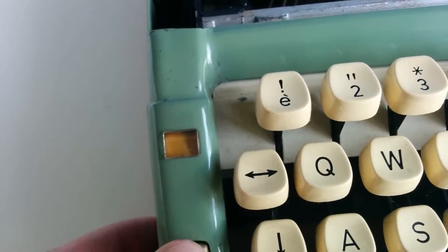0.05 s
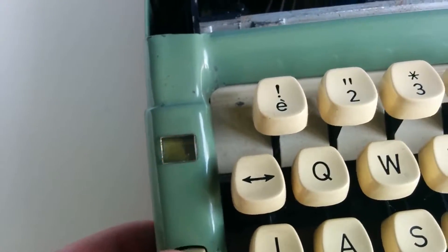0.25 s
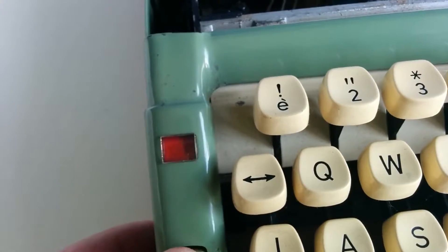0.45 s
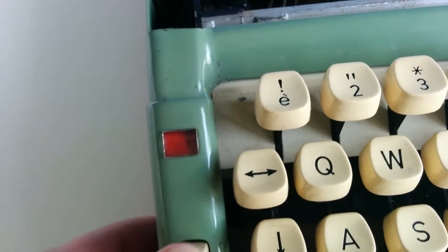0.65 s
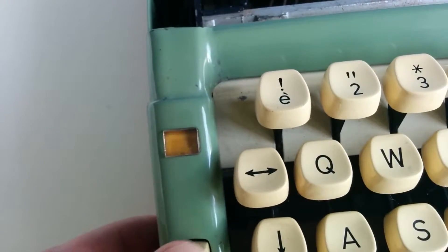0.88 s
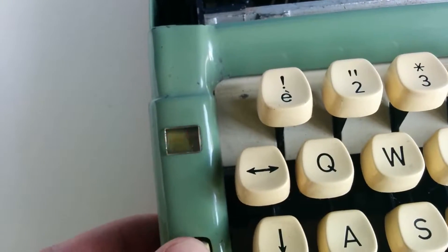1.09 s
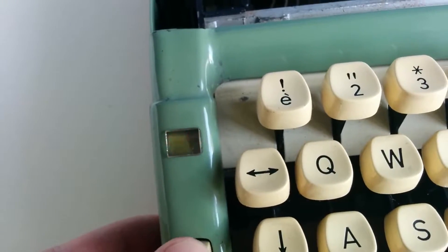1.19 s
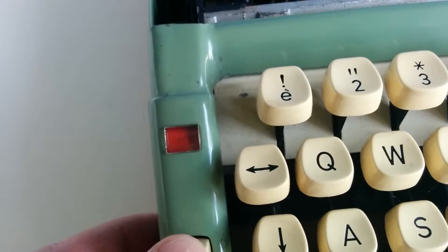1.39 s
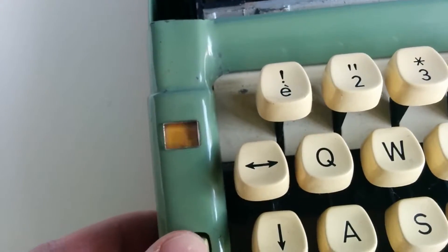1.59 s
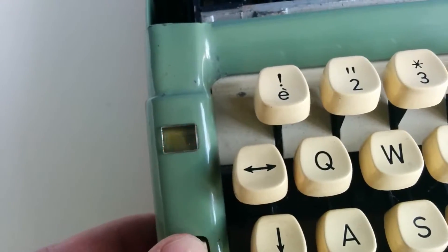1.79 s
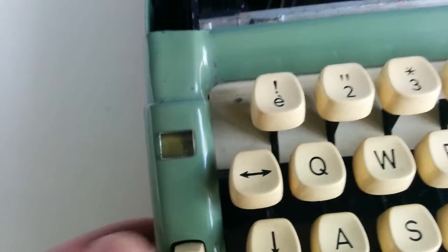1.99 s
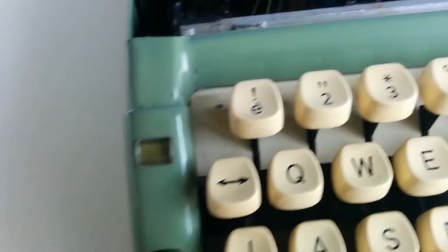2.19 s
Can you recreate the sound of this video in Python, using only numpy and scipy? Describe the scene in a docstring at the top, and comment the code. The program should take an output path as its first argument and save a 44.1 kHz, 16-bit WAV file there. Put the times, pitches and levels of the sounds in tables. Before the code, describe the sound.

Close, bright metal clacks and woody clunks as a small typewriter lever switches to and fro.

```python
"""A portable typewriter in a small, quiet room, one microphone close by. A finger flicks the ribbon-colour
lever to and fro seven times. Each round opens with a light double tick as the pawl crosses the middle
notch; a bright steel clack follows, rattling at one stop and thumping the case on the table; then the
lever comes back to the other stop with a woody clunk. Between the blows the microphone catches faint
rubbing, loose parts, a spring and the hand on the case. Springs and room ring on briefly."""
import sys
import numpy as np
from scipy import signal
from scipy.fft import rfft, irfft
from scipy.io import wavfile
from scipy.ndimage import uniform_filter1d

SR = 44100
rng = np.random.default_rng(int(sys.argv[2]) if len(sys.argv) > 2 else 0)


def log_audio(samples):
    """Write samples as a 16-bit WAV file to the path given in sys.argv[1]."""
    # one column per channel
    frames = np.atleast_2d(samples).T
    # limit to full scale, then quantise
    limited = np.clip(frames, -1, 1)
    pcm = np.round(limited * 32767).astype(np.int16)
    wavfile.write(sys.argv[1], SR, pcm)


N = 99225  # 2.25 s


def undb(db):
    """Decibels to gain; table levels are relative, and each source adds its own offset."""
    return 10 ** (np.asarray(db) / 20)


def on_log_axis(points, hz):
    """Read (Hz, value) points joined by straight lines over log frequency."""
    freqs, values = np.array(points, float).T
    return np.interp(np.log(hz + 1), np.log(freqs), values)


def noise(colour):
    """Coloured noise of rms 1, rolled off below 30 Hz."""
    hz = np.arange(N // 2 + 1) * SR / N
    spectrum = rfft(rng.standard_normal(N)) * undb(on_log_axis(colour, hz))
    wave = irfft(spectrum * hz / np.hypot(hz, 30), N)
    return wave / wave.std()


def fade(t, t60):
    """Exponential decay, 60 dB down after t60 seconds."""
    return np.exp(-np.log(1000) * np.maximum(t, 0) / t60)


def arch(start, length):
    """Half-sine swell over one movement, timed in seconds."""
    progress = np.clip((np.arange(N) / SR - start) / length, 0, 1)
    return np.sin(np.pi * progress).clip(0)


def crack(times, dbs, colour, rise, t60, tail_db, tail_t60):
    """Dense modes of each blow, as noise: a fast rise, a steep fall and a softer tail (times in s)."""
    t, power = np.arange(N) / SR, np.zeros(N)
    for at, db in zip(times, dbs):
        span = slice(max(int(at * SR), 0), int(at * SR) + SR // 4)
        age = np.maximum(t[span] - at, 0)
        decay = fade(age - rise, t60) + undb(tail_db) * fade(age - rise, tail_t60)
        power[span] += (undb(db) * np.minimum(age / rise, 1) * decay) ** 2
    return np.sqrt(power) * noise(colour)


def ring(times, dbs, modes, rise, scatter_db, detune, loose=True):
    """Each blow rings the same modes; a firm blow starts them in step, a loose one out of step."""
    hz, mode_db, t60 = np.array(modes, float).T[:, :, None]
    t = np.arange(int(min(t60.max(), 1) * SR)) / SR
    envelope = fade(t, t60) * np.minimum(t / rise, 1)
    draws = rng.standard_normal((len(times), 3, len(modes), 1))
    out = np.zeros(N + SR)
    for at, db, (size, shift, phase) in zip(times, dbs, draws):
        waves = np.cos(2 * np.pi * hz * (1 + detune * shift) * (t - rise) + loose * phase)
        gains = undb(db + mode_db + scatter_db * size)
        out[int(at * SR):][:len(t)] += (gains * envelope * waves).sum(0)
    return out[:N]


# The lever comes back to its stop (time [s], body level [dB], steel level [dB])
CLUNK_HITS = [(0.3221, 2, -1.5), (.6801, 1, -15), (0.9477, 2, 0.5), (1.2216, 1, -7), (1.459, 2, -1.5),
              (1.7250, 2, -6.5), (1.9711, 0, -0.5)]
# Contact noise of the steel snap and of the cover (frequency [Hz], level [dB])
SNAP_SPECTRUM = [(1500, -23), (3800, -0.5), (4700, -18), (5250, 11.5), (5650, -6), (6100, 6), (6900, -8),
                 (7400, 6), (8100, 0.5), (10000, -0.5), (12200, -9.5), (15500, -20.5)]
COVER_SPECTRUM = [(100, -22), (500, -17), (730, -9.5), (830, 4.5), (1150, -7.5), (1480, -5), (1850, -15.5),
                  (2100, -27.5), (2500, -1.5), (2950, -19.5), (3400, 7), (3750, -35), (4050, -18),
                  (4600, -27.5), (9000, -33)]
# Modes of the hollow cover (frequency [Hz], level [dB], t60 [s])
COVER_MODES = [(830, -6, .035), (915, -3, .035), (1030, -4, .03), (1137, -2, .055), (1215, -3, .06),
               (1335, -1, .06), (1420, -4, .055), (1515, -4, .045), (2020, -5, .045), (2180, -9, .045),
               (2455, -9, .045), (3280, -11, .03), (3415, -8, .035), (4020, -12, .03)]
def clunks(body_lag_s=0.0015, rebound_s=0.016):
    """The lever drags for a moment, snaps against its stop, and the cover answers with a hollow knock."""
    at, body_db, steel_db = np.array(CLUNK_HITS).T
    body_at = at + body_lag_s
    drag = crack(at - .0065, body_db - 22, CLICK_SPECTRUM,
                 rise=.0067, t60=.035, tail_db=-28.5, tail_t60=.04)
    snap = crack(at, steel_db - 10.5, SNAP_SPECTRUM, rise=.00026, t60=.022, tail_db=-25, tail_t60=.027)
    buzz = crack(body_at, body_db - 20, COVER_SPECTRUM, rise=.0012, t60=.025, tail_db=-14, tail_t60=.08)
    # the lever settles against the stop with a second, softer blow
    blow_at = np.r_[at, at + rebound_s] + body_lag_s
    blow_db = np.r_[body_db, body_db - 22.5]
    cover = ring(blow_at, blow_db - 17.5, COVER_MODES,
                 rise=.001183, scatter_db=0, detune=.0033, loose=False)
    case = ring(body_at, body_db - 46, CASE_MODES, rise=.003, scatter_db=-1.5, detune=.053)
    return drag + snap + buzz + cover + case


# The pawl leaves and drops into the middle notch (time [s], body level [dB], steel level [dB])
TICK_HITS = [(0.0807, -9, -13), (0.0913, -0.5, 2.5), (0.4376, -9.5, -10), (0.449, -3, -19),
             (.7420, -9.5, -9), (0.7521, -1, -2), (1.0054, -10, -10.5), (1.0172, -1.5, 5),
             (1.2707, -12, -10), (1.28, 0.5, 1), (1.522, -10, -11.5), (1.5322, -1, 0), (1.7685, -6, -5.5),
             (1.777, 1.5, 5)]
# Contact noise of small parts (frequency [Hz], level [dB])
CLICK_SPECTRUM = [(100, -12.5), (700, -15.5), (1100, -10), (1350, -1.5), (1850, -6), (2200, -2),
                  (2950, -11), (3500, -7), (4400, -6), (5100, -30.5), (6200, -12), (7000, -17.5),
                  (7700, -12.5), (9200, -23.5), (12500, -15.5), (15500, -27.5)]
# Modes of the pawl (frequency [Hz], level [dB], t60 [s])
PAWL_MODES = [(1120, -15.5, .04), (1318, -4, 0.088), (1396, -3.5, 0.06), (1527, 0, 0.067),
              (2132, -4.5, 0.069), (2600, -9, 0.096), (3476, -4, .035), (4010, -10, .035)]
def ticks(ring_lag_s=0.0011):
    """The pawl snaps over the middle notch and rings briefly."""
    at, body_db, steel_db = np.array(TICK_HITS).T
    snap = crack(at, steel_db - 25, SNAP_SPECTRUM, rise=.00055, t60=.012, tail_db=-25.5, tail_t60=.044)
    click = crack(at, body_db - 23, CLICK_SPECTRUM, rise=.0022, t60=.041, tail_db=-22, tail_t60=.15)
    pawl = ring(at + ring_lag_s, body_db - 23.5, PAWL_MODES,
                rise=.001438, scatter_db=-1, detune=.011, loose=False)
    return snap + click + pawl


# The linkage strikes the opposite stop and rebounds (time [s], steel level [dB], frame level [dB])
CLACK_HITS = [(.1485, 1.5, -0.5), (.1605, -4, -2.5), (.1755, -9.5, -8), (.1908, -17, -13.5),
              (0.5021, -8.5, -7), (.5048, 0.5, -3.5), (.5145, -6.5, -5.5), (.5202, -13, -14),
              (.8095, -3.5, -11), (.8122, -3, -2), (.8222, -3, -4), (.8275, -31, -5.5), (.8398, -8, -6.5),
              (1.0605, 0.5, -16.5), (1.0650, -6.5, -2), (1.0763, -4.5, -3.5), (1.0926, -7, -9.5),
              (1.1072, -16, -13), (1.3218, -4.5, -13.5), (1.3265, -2.5, -0.5), (1.3362, -8.5, -8.5),
              (1.3422, -6, -9.5), (1.5810, -3, -15.5), (1.5856, -4, -1), (1.5960, -6, -3),
              (1.6125, -4, -7.5), (1.6246, -34.5, -14.5), (1.8118, -2, -11), (1.8148, -1.5, -2.5),
              (1.8260, -4, -2.5), (1.8422, -5, -5), (1.8574, -15, -20.5)]
# Contact noise of the steel and of the frame (frequency [Hz], level [dB])
STEEL_SPECTRUM = [(1500, -10.5), (3000, -7), (4800, -10), (6100, 2), (6900, -3), (7700, -4), (10000, -5.5),
                  (12200, -5.5), (14500, -19.5), (16000, -22.5)]
FRAME_SPECTRUM = [(100, -19.5), (350, -10), (700, -20), (830, -2), (1050, -7), (1450, -0.5), (1800, -4),
                  (2500, -7), (2900, -13.5), (3400, -5), (5000, -11), (10000, -21.5)]
# Modes of the linkage and of the frame (frequency [Hz], level [dB], t60 [s])
LINKAGE_MODES = [(5300, -7, .03), (5890, -3, .035), (6040, -4, .04), (6245, -1, .05), (7300, -7, .04),
                 (7660, -5, .035), (8112, -8, .06), (8275, -9, .06), (9300, -9, .03)]
FRAME_MODES = [(800, -1, .085), (895, -1, .07), (1187, -1, .07), (1240, -5, .06), (1335, -4, .07),
               (1408, -6, .1), (1535, -2, .07), (2050, -8, .06), (2170, -8, .06), (2460, -11, .05),
               (3400, -9, .045), (3580, -13, .035)]
def clacks(frame_lag_s=0.001007):
    """Bright at close range: steel grazes, hits and rebounds, ringing the linkage and then the frame."""
    at, steel_db, frame_db = np.array(CLACK_HITS).T
    frame_at = at + frame_lag_s
    graze = crack(at - .005, steel_db - 23.5, STEEL_SPECTRUM,
                  rise=.0041, t60=.014, tail_db=-32, tail_t60=.02)
    strike = crack(at, steel_db - 8, STEEL_SPECTRUM, rise=.0009, t60=.014, tail_db=-20, tail_t60=.07)
    linkage_ring = ring(at, steel_db - 22, LINKAGE_MODES, rise=.000505, scatter_db=6, detune=.005)
    frame_buzz = crack(frame_at, frame_db - 15, FRAME_SPECTRUM,
                       rise=.0012, t60=.038, tail_db=-11, tail_t60=.13)
    frame_ring = ring(frame_at, frame_db - 22, FRAME_MODES, rise=.00199, scatter_db=5.5, detune=.0079)
    return graze + strike + linkage_ring + frame_buzz + frame_ring


# The case rocks after each clack (time [s], level [dB])
THUMP_HITS = [(.156, -2.5), (0.512, -2), (0.818, 0.5), (1.072, -3.5), (1.334, -1.5), (1.593, -1),
              (1.823, -2.5)]
# Low modes of the case (frequency [Hz], level [dB], t60 [s])
CASE_MODES = [(62, -12, .2), (90, -7, .14), (129, 0, .24), (202, 1, .17), (259, -3, .14), (340, -7, .07),
              (480, -9, .06)]
def thumps():
    """The whole case booms softly on the table, close to the microphone."""
    at, db = np.array(THUMP_HITS).T
    return ring(at, db - 28, CASE_MODES, rise=.009, scatter_db=2.5, detune=.024, loose=False)


# The linkage slides between the blows (time [s], length [s], level [dB])
SLIDE_STROKES = [(-.03, 0.078, -8.5), (0.118, 0.061, -0.5), (0.29, 0.061, -11), (0.429, 0.16, 3.5),
                 (0.637, 0.029, -7.5), (0.767, 0.044, -7), (0.884, .07, 2.5), (0.986, 0.083, 4),
                 (1.254, 0.065, 3), (1.389, 0.11, -1.5), (1.478, 0.1, 1), (1.66, 0.11, -17.5),
                 (1.743, .06, -1), (1.937, 0.059, -8), (2.193, 0.06, -14)]
# Rubbing noise (frequency [Hz], level [dB])
SLIDE_SPECTRUM = [(40, 0.5), (130, -5), (300, -7.5), (650, 1), (1400, 5), (2300, -4.5), (3600, 2),
                  (4500, -9), (5300, -13), (8000, -9), (15000, -49.5)]
def slides(grain_db=3, grain_s=0.0024):
    """Faint gritty rubbing of the linkage while the finger moves it."""
    t = np.arange(N) / SR
    level = sum(undb(db) * arch(at, length) ** .5 for at, length, db in SLIDE_STROKES)
    grit = np.interp(t / grain_s, np.arange(N // 10), rng.standard_normal(N // 10))
    return level * undb(-43.5 + grain_db * grit) * noise(SLIDE_SPECTRUM)


# Loose parts touch inside the case (time [s], level [dB])
RATTLE_HITS = [(.141, 0), (0.2762, -8), (0.299, -17), (.641, -14.5), (.929, -15), (1.034, -6), (1.053, 5),
               (1.806, 6.5), (1.892, -5), (1.922, -13.5)]
def rattles():
    """Tiny clicks of loose parts between the blows."""
    at, db = np.array(RATTLE_HITS).T
    return crack(at, db - 33, CLICK_SPECTRUM, rise=.0022, t60=.026, tail_db=-18, tail_t60=.065)


# The return spring is stretched (time [s], length [s], level [dB])
SPRING_STRETCHES = [(-.02, .075, -7), (0.851, 0.18, 1)]
def spring(centre_hz=4600, skirt_hz=560):
    """The stretched coil sings a thin, rough whistle: a narrow band of noise."""
    level = sum(undb(db) * arch(at, length) for at, length, db in SPRING_STRETCHES)
    band = [(centre_hz - skirt_hz, -35), (centre_hz, 0), (centre_hz + skirt_hz, -35)]
    return level * undb(-48) * noise(band)


# Course of the handling rumble (time [s], level [dB])
RUMBLE_LEVELS = [(0, -14), (.2, 7), (.27, -1.5), (.31, -9), (0.389, 6.5), (.45, -21), (.58, -2), (.7, -17),
                 (.78, 9), (.9, -24), (1.0, 7), (1.16, 6), (1.28, 4.5), (1.41, 1.5), (1.52, -12.5),
                 (1.72, -10.5), (2.0, 1.5), (2.1, -25.5)]
# Handling noise of the case (frequency [Hz], level [dB])
RUMBLE_SPECTRUM = [(30, -16.5), (70, -3), (128, 1.5), (165, -4), (215, -1), (300, -9.5), (480, -9),
                   (700, -18), (2000, -51.5)]
def rumble():
    """The hand jostles the case, a low rumble under the blows."""
    at, db = np.array(RUMBLE_LEVELS).T
    level_db = np.interp(np.arange(N) / SR, at, db)
    return undb(level_db - 54) * noise(RUMBLE_SPECTRUM)


# Colour of the small room's tail (frequency [Hz], level [dB])
ROOM_SPECTRUM = [(60, -3), (200, 1.5), (700, 0.5), (1400, -3), (2600, -0.5), (6000, -5), (8500, 0.5),
                 (11500, -5.5), (16000, -0.5)]
# Decay of that tail by band (frequency [Hz], t60 [s])
ROOM_DECAY = [(100, 0.13), (1500, 0.22), (5000, 0.19), (9000, 0.21), (16000, .2)]
def room(dry, build_s=0.0066):
    """Springs, type bars and near walls send a short diffuse tail back to the microphone."""
    t = np.arange(SR // 2) / SR
    hz = np.arange(SR // 4 + 1) * 2.
    spectrum = rfft(rng.standard_normal(len(t))) * undb(on_log_axis(ROOM_SPECTRUM, hz))
    centres, t60s = np.array(ROOM_DECAY).T
    tail = np.zeros(len(t))
    for weights, t60 in zip(np.eye(len(centres)), t60s):
        band = on_log_axis(np.c_[centres, weights], hz)  # crossfades into the neighbouring bands
        tail += irfft(spectrum * band, len(t)) * fade(t, t60)
    tail *= np.minimum(t / build_s, 1)
    return signal.fftconvolve(dry, tail / np.linalg.norm(tail))[:N]


# Background of the quiet room (frequency [Hz], level [dB])
ROOM_TONE_SPECTRUM = [(25, -5), (130, -4), (450, -4), (1000, -8), (3000, -18), (8000, -16), (16000, -39.5)]
def room_tone():
    """A steady, dull hush far below the typewriter."""
    return undb(-64) * noise(ROOM_TONE_SPECTRUM)


def scene():
    """At the close microphone, in mono: mostly direct sound, with a little of the room behind it."""
    direct = clunks() + ticks() + clacks() + thumps() + slides() + rattles() + spring() + rumble()
    return (direct + undb(-14) * room(direct) + room_tone())[None]


def record(dry):
    """The recorder drops deep bass, turns quiet mids and treble down, rounds peaks and cuts the top."""
    low_cut_hz, split_hz, top_hz = 76, 350, 15700
    threshold_db, gate_slope, depth_db, window_s = -50, 1.24, 12, 0.039
    x = signal.sosfilt(signal.butter(2, low_cut_hz, "high", fs=SR, output="sos"), dry)
    bass = signal.sosfiltfilt(signal.butter(2, split_hz, fs=SR, output="sos"), x)
    upper = x - bass
    power = uniform_filter1d(upper ** 2, int(window_s * SR))
    level_db = 10 * np.log10(np.maximum(power, 1e-12))
    gate_db = np.clip(gate_slope * (level_db - threshold_db), -depth_db, 0)
    gated = bass + upper * undb(gate_db)
    rounded = .75 * np.tanh(gated / .75)
    return signal.sosfilt(signal.ellip(8, .2, 70, top_hz, fs=SR, output="sos"), rounded)


dry = scene()
out = record(dry)
log_audio(out)
```